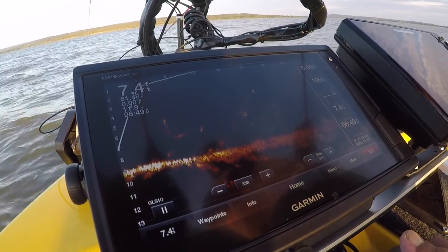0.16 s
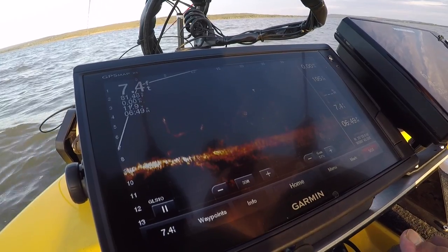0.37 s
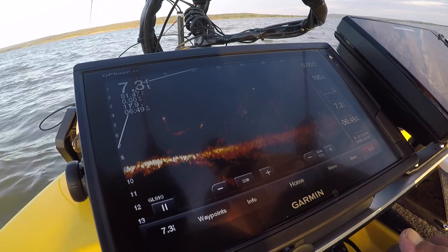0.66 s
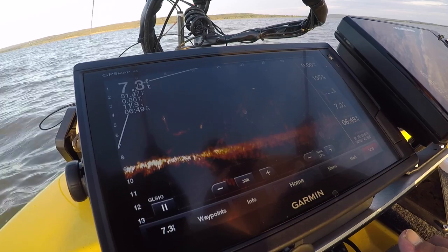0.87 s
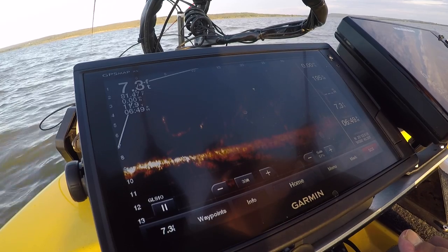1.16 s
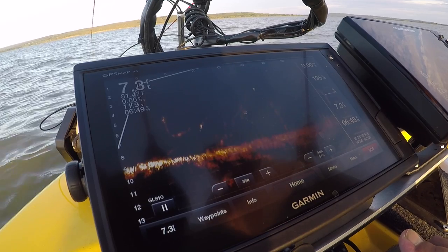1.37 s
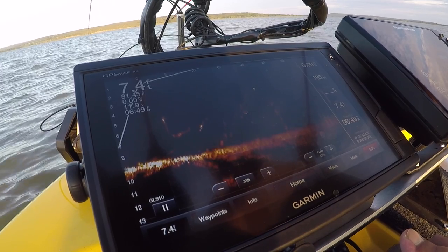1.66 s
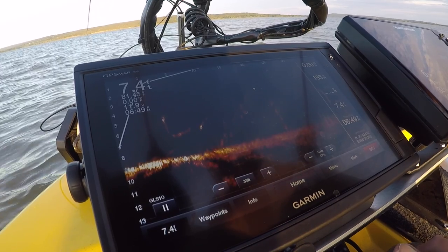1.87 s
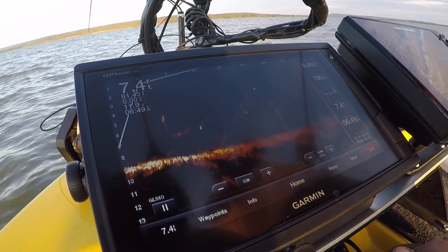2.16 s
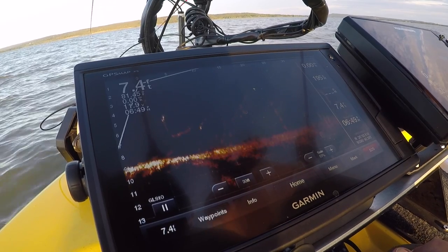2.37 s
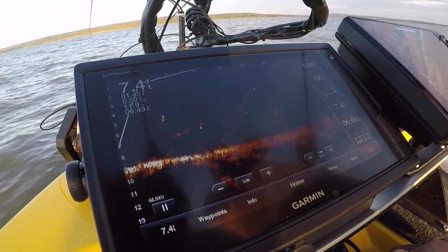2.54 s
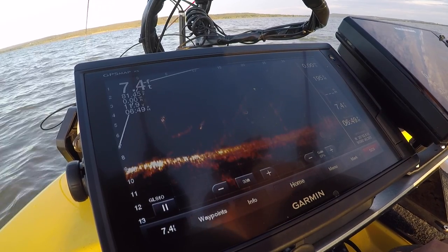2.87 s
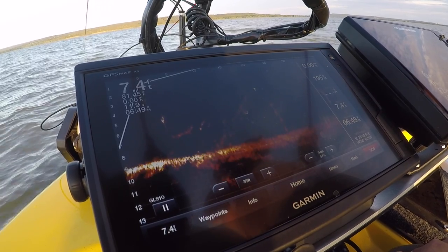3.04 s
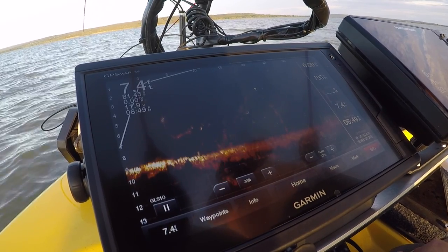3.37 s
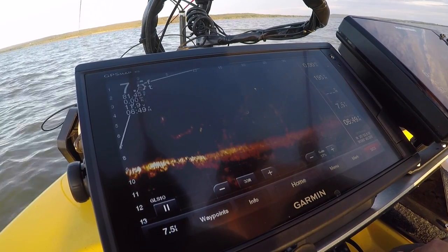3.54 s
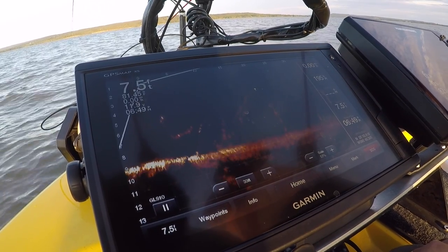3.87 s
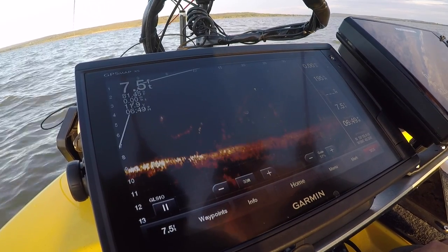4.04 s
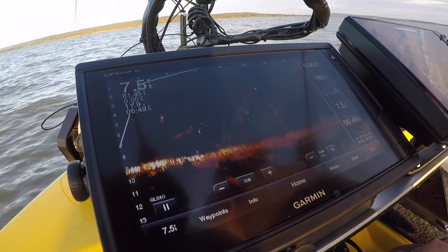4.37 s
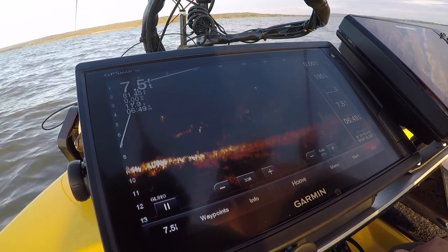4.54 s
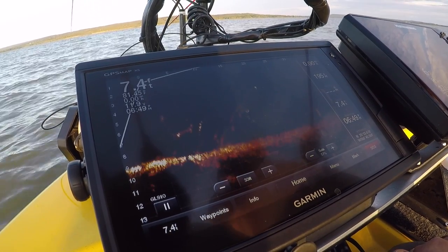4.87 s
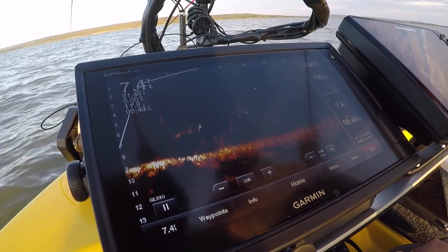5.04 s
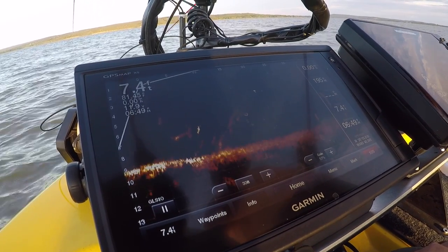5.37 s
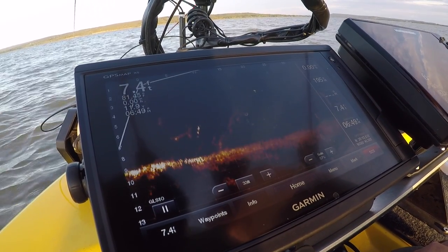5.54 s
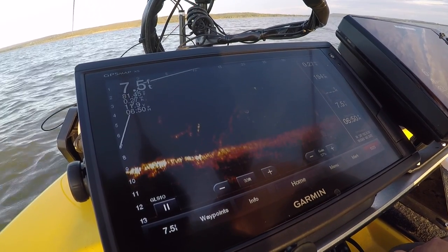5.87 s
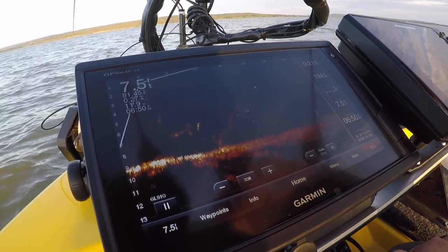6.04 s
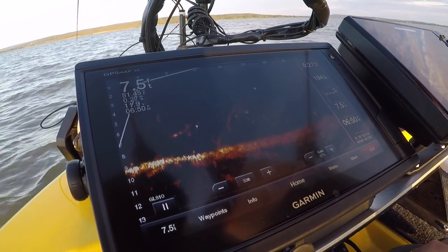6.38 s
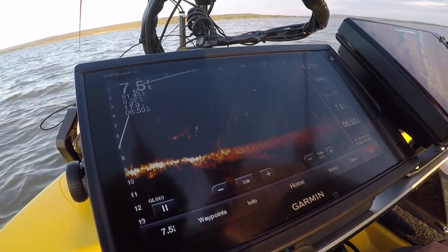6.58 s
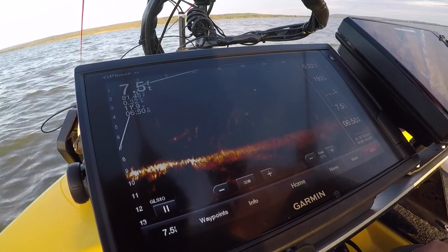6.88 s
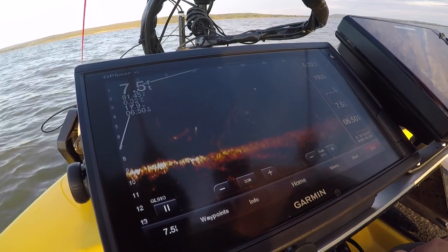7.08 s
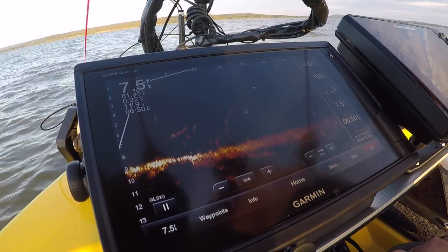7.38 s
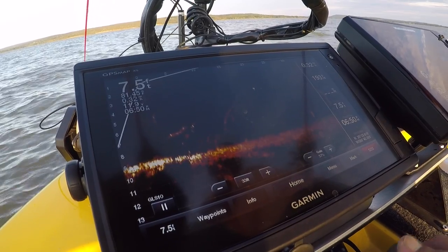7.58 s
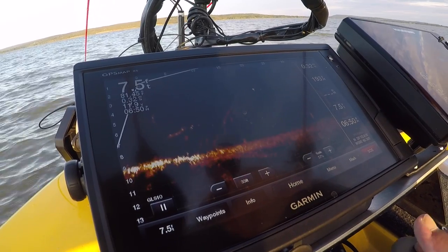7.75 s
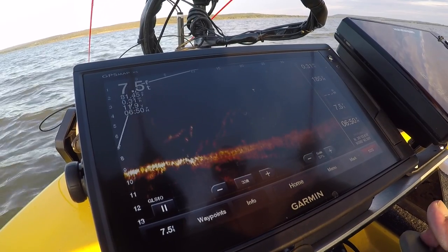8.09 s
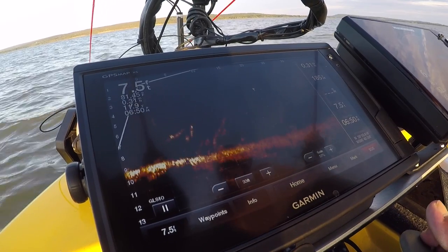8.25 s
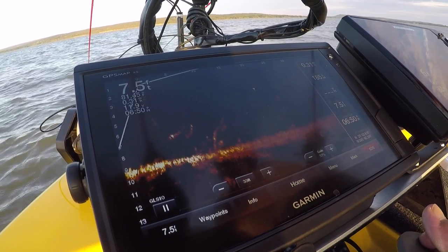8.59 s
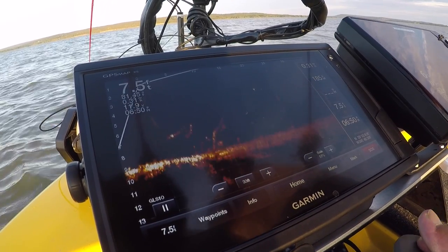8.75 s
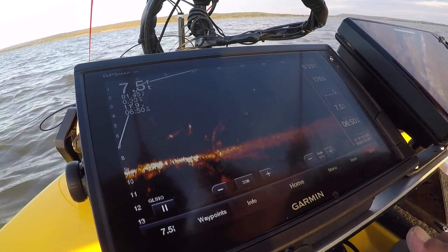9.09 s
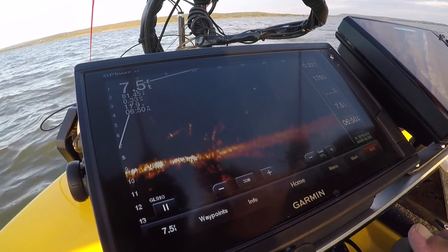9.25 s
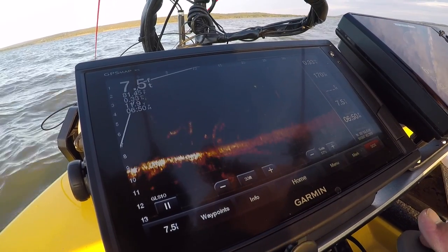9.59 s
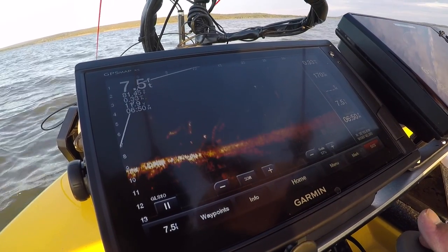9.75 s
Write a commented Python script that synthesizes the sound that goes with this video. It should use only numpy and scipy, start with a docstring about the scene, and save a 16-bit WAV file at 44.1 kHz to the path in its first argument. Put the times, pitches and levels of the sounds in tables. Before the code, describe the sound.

On open water, small waves slap a hollow plastic hull irregularly, each a low plop or knock breaking into bubbles and a short splash. Thin gurgling wash runs between. Wind buffets the close microphone with soft low rumble. A very faint motor hum appears in the middle and fades. Sharp reel ticks cluster late, after a brief fizzy line rub, with slight hiss throughout.

```python
"""Small waves slap a plastic hull: each traps air pockets that thud and ring, then breaks into spray and bubbles.
Pockets and bubbles are short gliding sines; splash and hiss bursts, spray and wash are ragged coloured noise.
A few fizzy bursts near 7.5-7.7 s are fishing line or reel rubbing; the reel's pawl ticks through resonances.
Wind buffets the microphone as low noise, a small motor hums for a while as a sum of shaft orders,
and a preamplifier hisses faintly throughout."""
import sys
import numpy as np
from scipy.fft import rfft, irfft, next_fast_len
from scipy.io import wavfile
from scipy.ndimage import map_coordinates

SR = 44100
rng = np.random.default_rng(int(sys.argv[2]) if len(sys.argv) > 2 else 0)


def file_out(sig):
    """Save sig as 16-bit WAV at sys.argv[1]."""
    # one column per channel
    cols = np.atleast_2d(sig).T
    # limit, then scale
    lim = np.clip(cols, -1, 1)
    pcm = np.round(lim * 32767).astype(np.int16)
    wavfile.write(sys.argv[1], SR, pcm)


N = 437457  # samples


def amp(db):
    """Decibels to gain."""
    return 10 ** (np.asarray(db) / 20)


def unit(x):
    """Scale to rms 1."""
    return x / np.sqrt(np.mean(x ** 2) + 1e-20)


def curves(rows):
    """One value per sample for each column after the time."""
    time_s, *columns = np.transpose(rows)
    return [np.interp(np.arange(N) / SR, time_s, column) for column in columns]


def wobble(rate_hz):
    """Smooth random curve with rate_hz knots per second."""
    knots = rng.standard_normal(int(N * rate_hz / SR) + 4)
    return map_coordinates(knots, [np.arange(N) * rate_hz / SR])


def filtered(x, response):
    """Multiply the spectrum of x by a complex response of frequency."""
    size = next_fast_len(N + SR // 2)
    spectrum = rfft(x, size) * response(np.fft.rfftfreq(size, 1 / SR))
    return irfft(spectrum, size)[..., :N]


def noise(spectrum):
    """Noise of rms 1 coloured by (Hz, dB) points, joined on a log frequency axis."""
    freq_hz, db = np.transpose(spectrum)
    colour = lambda hz: amp(np.interp(np.log(hz + 1), np.log(freq_hz + 1), db))
    return unit(filtered(rng.standard_normal(N), colour))


def resonances(modes):
    """Causal response of parallel band-pass resonances with alternating sign."""
    def response(f):
        total = 0
        for k, (centre, width, db) in enumerate(modes):
            damping = 1j * f * width
            total = total + (-1) ** k * amp(db) * damping / (centre ** 2 - f ** 2 + damping)
        return total
    return response


def lay(start_s, shapes):
    """Sum rows of short sounds at their start times."""
    first = np.round(np.asarray(start_s) * SR).astype(int)
    at = first[:, None] + np.arange(shapes.shape[1])
    return np.bincount(np.clip(at, 0, None).ravel(), shapes.ravel(), N + 2 * SR)[:N]


def swell(db, rise_s, size):
    """Envelope rows u*exp(1-u): up to a peak after about one rise time, then a decay at the same pace."""
    u = np.arange(size) / SR / (np.abs(rise_s)[:, None] + 1e-4)
    return amp(db)[:, None] * u * np.exp(1 - u)


def rings(start_s, db, hz, rise_s, glide, size):
    """Air bubbles: swelling sines whose pitch glides while they ring."""
    t = np.arange(size) / SR
    bend = np.reshape(glide, (-1, 1)) * t / (np.abs(rise_s)[:, None] + 1e-4)
    phase = 2 * np.pi * hz[:, None] * t * (1 + bend)
    return lay(start_s, swell(db, rise_s, size) * np.sin(phase))


# wind buffeting: time_s, level_db
WIND_LEVEL = [(0, -41.5), (0.45, -33.5), (1.0, -40), (1.5, -37), (2.1, -32.5), (2.7, -35), (3.2, -29.5),
              (3.7, -36.5), (4.2, -26.5), (4.7, -33.5), (5.2, -28), (5.8, -30), (6.3, -29), (6.8, -34),
              (7.3, -33), (8.2, -28), (9.1, -30.5), (9.92, -37.5)]
# buffet spectrum: freq_hz, relative_db
WIND_SPECTRUM = [(2, 0), (14, 1), (25, -10), (62, -20), (86, -28), (160, -44), (400, -75)]


def wind():
    """Turbulence at the microphone port: slow pressure lumps, heard as uneven low noise."""
    buffet_db, = curves(WIND_LEVEL)
    return amp(buffet_db) * unit(amp(1.36 * wobble(2.89)) * noise(WIND_SPECTRUM))


# water along the hull: time_s, gurgle_db, spray_db
WASH_LEVELS = [(0, -52, -62.5), (0.3, -65.5, -64.5), (1.8, -58.5, -65), (2.7, -57.5, -63.5),
               (3.7, -54.5, -64.5), (4.5, -62, -62.5), (4.9, -59, -64), (5.7, -47.5, -65),
               (6.3, -60, -65.5), (7.1, -57, -61), (7.5, -57.5, -65), (8.2, -49, -59.5), (8.7, -61, -61),
               (9.2, -52.5, -59.5), (9.7, -60.5, -65)]
# low water noise, also in splashes: freq_hz, relative_db
GURGLE_SPECTRUM = [(50, -52), (90, 6.5), (170, 2), (350, -8.5), (700, -18.5), (1500, -27), (4000, -43)]
# thin spray: freq_hz, relative_db
SPRAY_SPECTRUM = [(200, -43), (500, 4.5), (1000, 0.5), (2000, -7.5), (6000, -15), (12000, -18.5),
                  (16000, -63)]
DROPS_GROW = 1.24  # dB of droplet level per dB of spray
BUBBLE_CYCLES = 1.4  # median rise of droplets and splash bubbles, in cycles


def wash(count=3200):
    """Water sliding along the hull: a gurgle and thin spray, strewn with droplets and small spatters."""
    gurgle_db, spray_db = curves(WASH_LEVELS)
    out = amp(gurgle_db + 2.14 * wobble(25)) * noise(GURGLE_SPECTRUM)
    out += amp(spray_db - 3.5 + 1.8 * wobble(45)) * noise(SPRAY_SPECTRUM)

    place, chance = rng.random((2, count))
    pitch_dev, rise_dev = rng.standard_normal((2, count))
    at = (place * N).astype(int)
    hz = np.clip(1600 * np.exp(0.784 * pitch_dev), 250, 10000)
    # droplets come in clumps; few are loud, higher ones are fainter
    mean_db = spray_db.mean()
    db = mean_db + DROPS_GROW * (spray_db[at] - mean_db) - 8
    db += 3 * wobble(25)[at] - 4 * np.log(chance + 0.053) - 4 * np.log2(hz / 1600)
    rise_s = BUBBLE_CYCLES * np.exp(0.5 * rise_dev) / hz
    out += rings(at / SR, db, hz, rise_s, 0.0077, size=1200)

    # one droplet in twelve also gives a short burst of spray
    few = slice(0, count // 12)
    spatter_db = spray_db[at[few]] - 7 - 4 * np.log(chance[few] + 0.1)
    spatter_rise_s = 0.002 * np.exp(0.4 * rise_dev[few])
    spatter = lay(at[few] / SR, swell(spatter_db, spatter_rise_s, size=1500))
    return out + spatter * noise(SPRAY_SPECTRUM)


# single pawl ticks: start_s, level_db
SINGLE_TICKS = [(0.0228, -45.5), (0.0556, -50), (2.315, -48.5), (2.365, -50), (3.3054, -35.5), (6.801, -47),
                (7.2632, -32.5), (7.6829, -33.5), (7.6918, -29), (7.888, -43.5), (7.897, -40),
                (7.9221, -35), (8.1595, -43), (8.1826, -37.5), (8.1928, -38), (8.2134, -38.5), (8.284, -40),
                (8.319, -43), (8.3402, -41.5), (8.363, -39), (8.3707, -45), (8.3872, -40), (9.0424, -40),
                (9.175, -43.5)]
# spool turns: start_s, tick_count, mean_gap_ms, mean_level_db
SPOOL_TURNS = [(2.632, 3, 19, -58), (2.7077, 3, 19, -55.5), (2.769, 3, 35, -56), (3.056, 2, 54, -55),
               (9.572, 6, 23.2, -40.5)]
TURN_JITTER, TURN_SCATTER_DB = 0.064, -2.5  # deviation as share of the gap; tick to tick


def pawl_ticks():
    """Times and levels of single ticks, and of rows of ticks while the spool turns."""
    rows = list(SINGLE_TICKS)
    for start_s, ticks, gap_ms, db in SPOOL_TURNS:
        late, scatter = rng.standard_normal((round(ticks), 2)).T
        at_s = start_s + gap_ms / 1000 * (np.arange(len(late)) + TURN_JITTER * late)
        rows += list(zip(at_s, db + TURN_SCATTER_DB * scatter))
    return np.transpose(rows)


# pawl resonances: centre_hz, width_hz, gain_db
PAWL_MODES = [(4120, 830, -5), (5600, 690, -5.5), (8060, 1700, -1.5), (9340, 1800, -8), (12500, 1500, -18)]
# reel body resonances: centre_hz, width_hz, gain_db
REEL_MODES = [(444, 170, 7), (1480, 360, -0.5), (2250, 1450, -5)]


def reel():
    """Each tick is a sharp snap of the pawl and a short rattle in the reel body: decaying noise, resonated."""
    start_s, db = pawl_ticks()
    t = np.arange(900) / SR
    rattle = rng.standard_normal((2, len(start_s), len(t)))
    rattle[:, :, 0] = 6  # the blow itself, alike every time
    # each decay is -60 dB over the time in seconds
    snap_decay = amp(-60 * t / 0.00083) + 0.87 * amp(-60 * t / 0.019)
    snap = lay(start_s, amp(db[:, None] - 0.5) * rattle[0] * snap_decay)
    knock = lay(start_s, amp(db[:, None] + 3.5 - 60 * t / 0.058) * rattle[1])
    return filtered(snap, resonances(PAWL_MODES)) + filtered(knock, resonances(REEL_MODES))


# bursts of splash and hiss: crests breaking on the hull, and near 7.5-7.7 s line or reel rubbing:
# start_s, level_db, base_rise_ms, fizz_over_level_db
BURSTS = [(0.385, -53.5, 5, -18), (0.645, -55, 3.5, -35), (0.992, -44, 5.9, -17), (1.056, -47, 9.6, -15),
          (1.115, -43, 8.4, -25), (1.142, -42.5, 6, -13), (1.647, -37.5, 3.7, -26), (1.677, -69, 3, 15.5),
          (2.016, -41, 1.85, -36), (2.379, -39, 4.8, -12), (2.421, -39, 4.4, -17), (2.44, -53.5, 18, -35),
          (2.583, -57, 2.8, -1), (2.917, -48, 4.1, -9.5), (3.39, -43, 3.9, -23), (3.411, -48, 4.1, -12),
          (3.492, -39.5, 2.9, -13.5), (3.528, -38, 5.1, -11.5), (4.128, -45, 5.8, -5),
          (4.16, -50.5, 11, -8), (4.329, -47, 16.6, -15.5), (4.401, -45, 10.8, -26),
          (4.49, -53.5, 16.5, -9), (4.62, -64.5, 4.6, 4), (5.027, -45, 2.3, -15), (5.29, -38, 22, -18.5),
          (5.43, -51.5, 19, -31), (5.571, -44, 5, -12), (5.6, -54.5, 3.2, -8), (5.71, -50.5, 9.1, -17),
          (5.738, -45, 7.7, -12.5), (6.542, -41, 8.7, -14), (6.62, -45.5, 9.1, -14.5),
          (6.669, -43, 31, -10.5), (6.703, -38, 15, -32), (6.776, -46, 14, -18), (7.457, -55.5, 1.5, 7),
          (7.49, -62, 36, -0.5), (7.598, -47, 3.1, -11), (7.72, -41, 4.4, -3.5), (7.794, -44, 1.5, -35),
          (7.83, -44.5, 3.8, -11), (7.935, -38, 10.8, -16), (7.99, -47.5, 43, -30),
          (8.078, -46.5, 10.8, -18.5), (8.862, -46.5, 4.8, -14), (8.98, -53, 6.1, -12),
          (9.089, -44.5, 7, -20), (9.123, -45, 17, -23), (9.27, -41.5, 6.3, -15), (9.395, -56.5, 3.9, -6.5),
          (9.862, -48, 7, -14), (9.882, -40.5, 6.4, -15.5)]
# burst body: freq_hz, relative_db
BURST_SPECTRUM = [(90, 3), (200, 19), (500, 7.5), (1000, 0), (2000, 0.5), (3200, -14), (6000, -23.5)]
# burst treble: freq_hz, relative_db
FIZZ_SPECTRUM = [(1500, 5.5), (3000, 3), (5000, -1), (8500, -7.5), (16000, -33)]
ROUND, SPREAD = 1.04, 1.114  # burst envelope: power of the swell, factor on the rise
TRAIL_S = 0.005  # added to the mean bubble delay


def splash_and_hiss_bursts(count=36):
    """Crests, or line or reel rubbing: ragged noise and fizz, with short gliding sines and a low gurgle tail."""
    start_s, db, rise_ms, fizz_db = np.transpose(BURSTS)
    rise_s = rise_ms / 1000
    burst = swell(0 * db, SPREAD * rise_s, size=6000) ** ROUND
    body = lay(start_s, amp(db - 4)[:, None] * burst)
    fizz = lay(start_s, amp(db + fizz_db)[:, None] * burst)
    drain = lay(start_s, swell(db - 7, rise_s + 0.019, size=12000))
    out = body * amp(4 * wobble(110)) * noise(BURST_SPECTRUM)
    out += fizz * amp(4.3 * wobble(260)) * noise(FIZZ_SPECTRUM)
    out += drain * amp(4.8 * wobble(40)) * noise(GURGLE_SPECTRUM)

    # bubble-like sines start all through the swell and trail it; the later, the fainter
    pitch_dev, level_dev, rise_dev = rng.standard_normal((3, len(start_s), count))
    late = rng.gamma(2, 0.5, (len(start_s), count))  # mean 1
    hz = np.clip(1200 * np.exp(0.646 * pitch_dev), 200, 9000)
    bubble_db = db[:, None] - 10 - 3.3 * late + 3 * level_dev - 4 * np.log2(hz / 1300)
    bubble_s = start_s[:, None] + late * (2.2 * rise_s[:, None] + TRAIL_S)
    bubble_rise_s = BUBBLE_CYCLES * np.exp(0.5 * rise_dev) / hz
    return out + rings(bubble_s.ravel(), bubble_db.ravel(), hz.ravel(), bubble_rise_s.ravel(), 0.015, size=1500)


# air trapped by a wave: start_s, level_db, pitch_hz
AIR_POCKETS = [(0.394, -52.5, 2170), (0.645, -32, 427), (0.995, -37, 434), (1.063, -36, 710),
               (1.118, -26, 237), (1.145, -28.5, 336), (1.405, -43, 373), (1.605, -43, 600),
               (1.65, -30, 627), (1.651, -35, 1350), (1.658, -30, 135), (1.678, -36.5, 1410),
               (1.69, -33.5, 154), (1.898, -49.5, 1130), (2.02, -27, 335), (2.027, -26.5, 131),
               (2.039, -28, 239), (2.143, -42, 1060), (2.382, -38.5, 810), (2.404, -41, 840),
               (2.422, -22, 590), (2.424, -43.5, 2390), (2.432, -27.5, 246), (2.917, -37, 830),
               (2.92, -34, 377), (3.393, -39, 835), (3.413, -39, 545), (3.502, -18.5, 143),
               (3.528, -34.5, 626), (3.543, -28, 171), (3.925, -47.5, 2260), (4.131, -39.5, 1890),
               (4.141, -30, 477), (4.238, -37.5, 184), (4.331, -44, 1020), (4.43, -34.5, 407),
               (4.497, -46, 1400), (4.505, -41.5, 580), (4.559, -55, 1290), (4.589, -50, 900),
               (4.812, -55, 3700), (5.3, -25, 285), (5.316, -25, 377), (5.318, -41, 1000),
               (5.332, -23, 192), (5.407, -39, 950), (5.572, -32, 298), (5.575, -46, 436),
               (5.746, -37, 644), (5.762, -30.5, 166.4), (5.807, -45.5, 1530), (6.553, -32, 307),
               (6.708, -40, 1050), (6.718, -33, 407), (6.73, -30, 231), (6.816, -37.5, 222),
               (7.267, -36.5, 198), (7.552, -50, 1570), (7.6, -43.5, 2210), (7.694, -28, 805),
               (7.723, -36.5, 2220), (7.725, -32, 810), (7.798, -38, 860), (7.799, -39, 450),
               (7.814, -36.5, 990), (7.832, -33.5, 270), (7.833, -43, 1610), (7.94, -26.5, 262),
               (7.942, -39, 1350), (7.955, -24, 140), (7.97, -33, 235), (8.079, -34.5, 300),
               (8.088, -35, 705), (8.105, -39, 747), (8.14, -40, 864), (8.346, -38.5, 458),
               (8.477, -52, 1830), (8.533, -41.5, 470), (8.703, -43, 402), (8.723, -38.5, 187),
               (8.863, -39.5, 820), (8.866, -33, 332), (8.878, -45, 1080), (8.989, -50, 1040),
               (9.114, -26.5, 288), (9.182, -33, 170), (9.278, -44.5, 1900), (9.281, -39.5, 1010),
               (9.286, -39.5, 270), (9.286, -41, 1600), (9.332, -46, 1270), (9.898, -23.5, 256)]
POCKET_RISE_MS, RISE_FALLS = 2.31, 0.47  # at 400 Hz; power of pitch by which smaller pockets ring shorter
SHED_DB, SHED_SPREAD, SHED_LATE = -8.5, 0.24, 2.494  # re pocket; log pitch scatter; mean delay in rises


def pockets(count=2):
    """Each trapped air pocket rings unevenly at the pitch of its size, then breaks into fainter ones near it."""
    start_s, db, hz = np.transpose(AIR_POCKETS)
    rise_s = POCKET_RISE_MS / 1000 * (400 / hz) ** RISE_FALLS
    glide = 0.01 * rng.standard_normal(len(start_s))
    out = rings(start_s, db, hz, rise_s, glide, size=5000)
    for _ in range(count):
        delay_s = 2 * SHED_LATE * rise_s * rng.random(len(start_s))
        shed_hz = hz * np.exp(SHED_SPREAD * rng.standard_normal(len(start_s)))
        out += rings(start_s + delay_s, db + SHED_DB, shed_hz, rise_s, 0, size=5000)
    return out * amp(1.85 * wobble(300))


# motor shaft orders: multiple_of_shaft_rate, relative_db
SHAFT_ORDERS = [(2, -5), (3, 4.5), (5, -5), (6, 4.5), (7, 2.5), (9, 1), (10, -8.5)]
SHAFT_HZ, MOTOR_DB = 43.7, -69  # mean rate; level at 0 dB relative
MOTOR_ON_S, RUN_UP_S, MOTOR_OFF_S, FADE_DB_PER_S = 2.65, 0.55, 7.2, 9


def motor():
    """Shaft orders, each wavering in level; the hum swells in quickly and fades out slowly."""
    t = np.arange(N) / SR
    run_up = np.clip((t - MOTOR_ON_S) / RUN_UP_S, 0, 1) ** 2
    fade = amp(-FADE_DB_PER_S * np.clip(t - MOTOR_OFF_S, 0, None))
    turn = 2 * np.pi * np.cumsum(SHAFT_HZ * (1 + 0.0018 * wobble(3.02))) / SR
    hum = np.zeros(N)
    for multiple, db in SHAFT_ORDERS:
        start_phase = rng.uniform(0, 2 * np.pi)
        hum += amp(db + 3.1 * wobble(5)) * np.sin(multiple * turn + start_phase)
    return amp(MOTOR_DB) * run_up * fade * hum


def scene():
    """Everything reaches one microphone."""
    return (wind() + wash() + reel() + splash_and_hiss_bursts() + pockets() + motor())[None]


# preamplifier hiss: freq_hz, relative_db
HISS_SPECTRUM = [(1500, 6), (4000, -12), (12000, 2), ]
TOP_HZ = 15400  # band limit


def record(dry):
    """The preamplifier hisses, the port dulls the highest treble and nothing passes above the band limit."""
    port = lambda hz: (hz < TOP_HZ) / (1 + (hz / 12500) ** 6)
    hiss = filtered(amp(-78.5) * noise(HISS_SPECTRUM), lambda hz: hz < TOP_HZ)
    return filtered(dry, port) + hiss


dry = scene()
out = record(dry)
file_out(out)
```